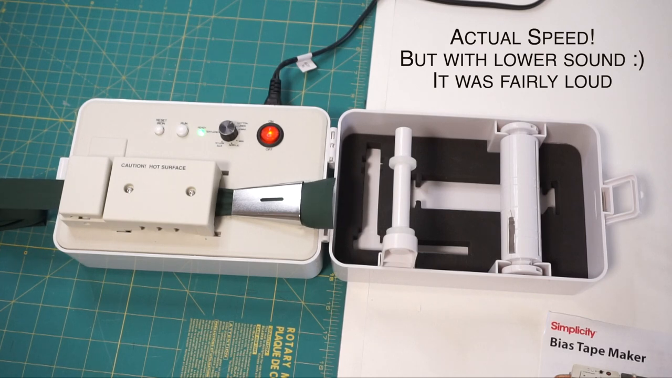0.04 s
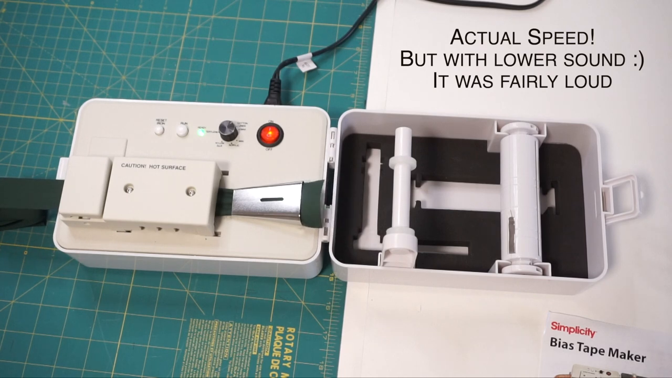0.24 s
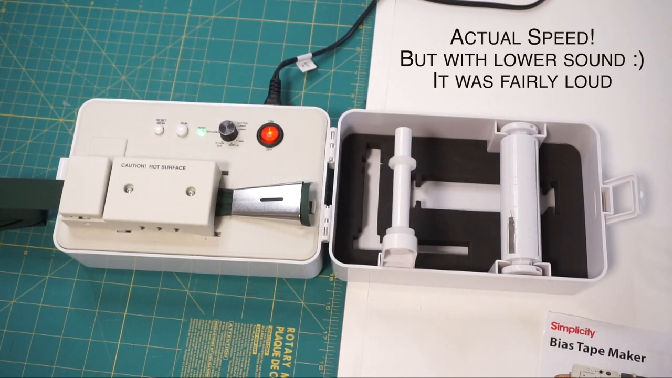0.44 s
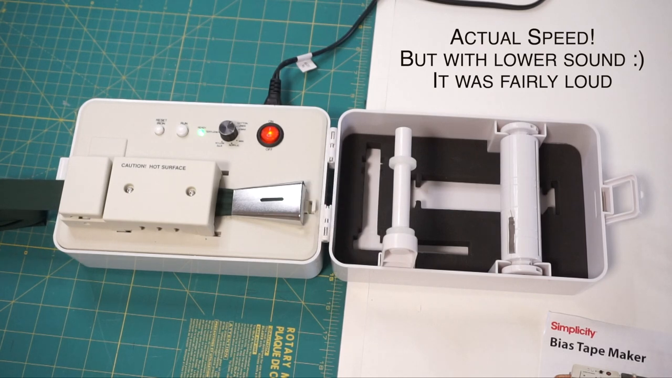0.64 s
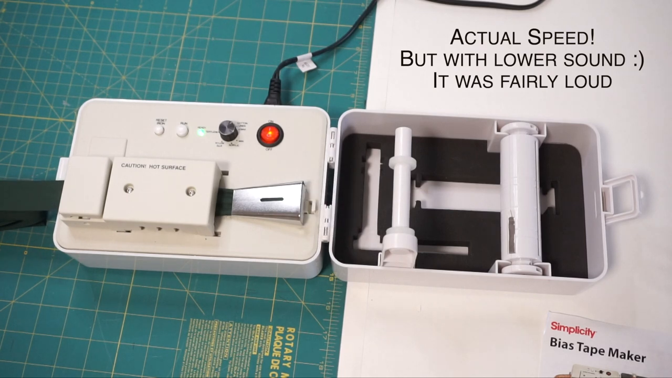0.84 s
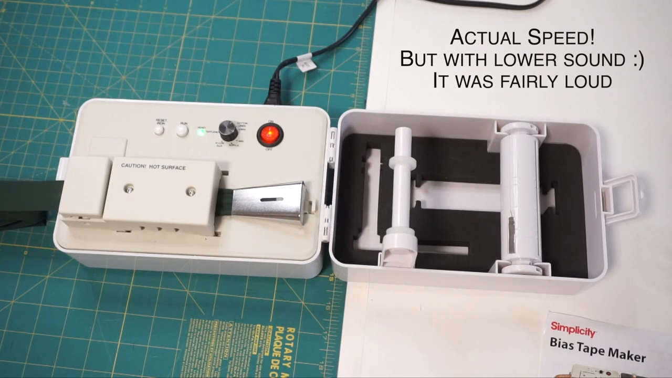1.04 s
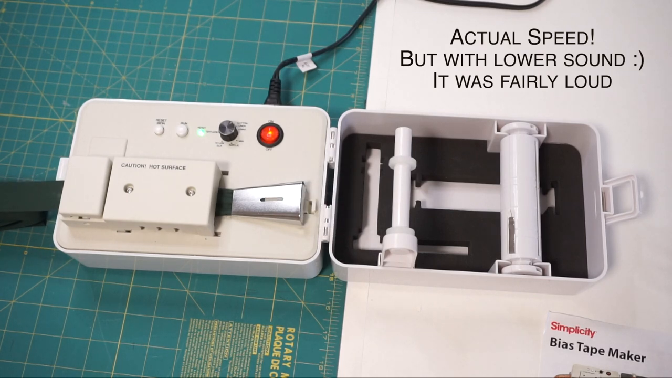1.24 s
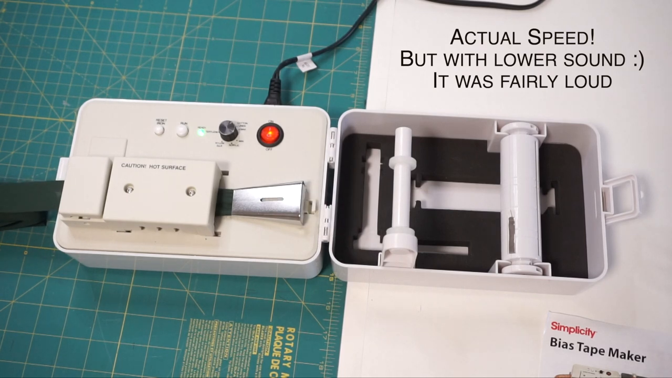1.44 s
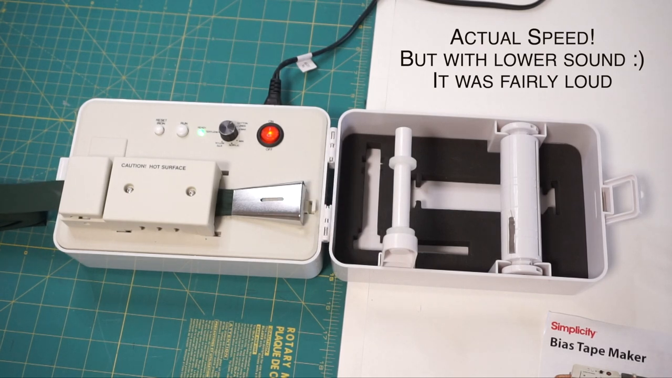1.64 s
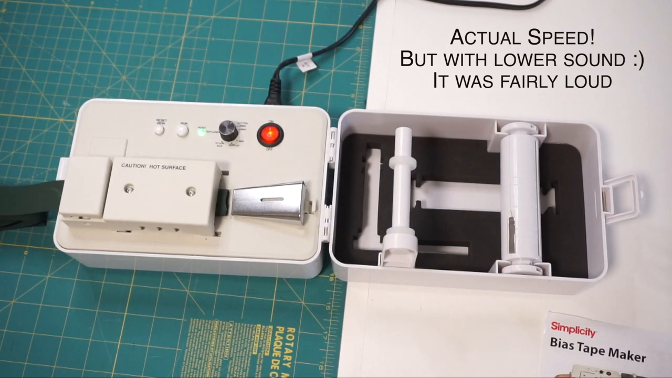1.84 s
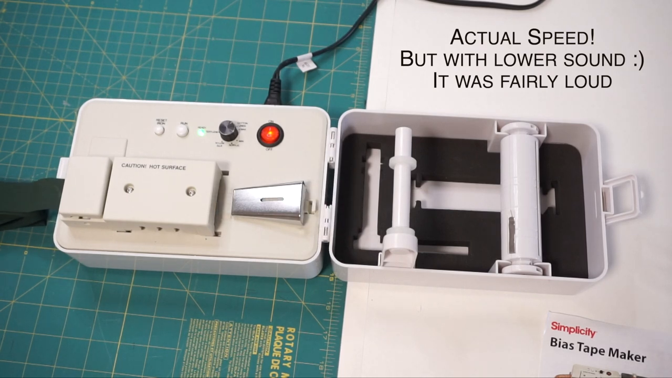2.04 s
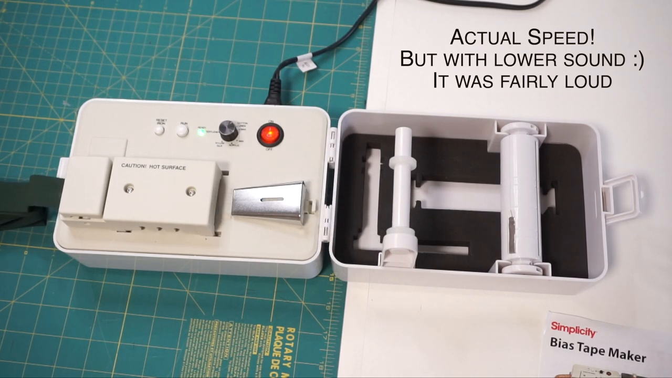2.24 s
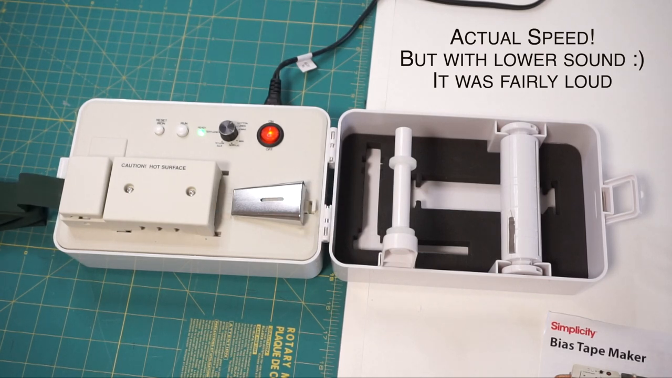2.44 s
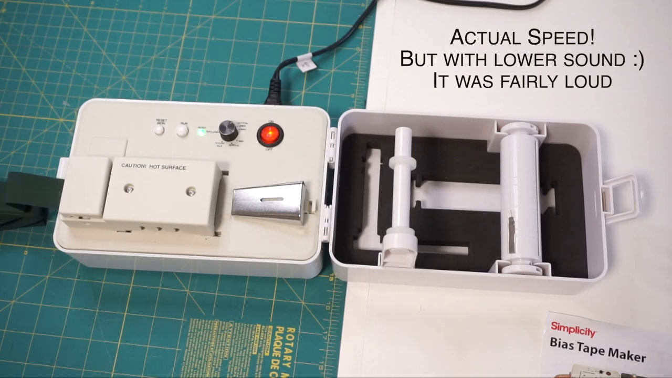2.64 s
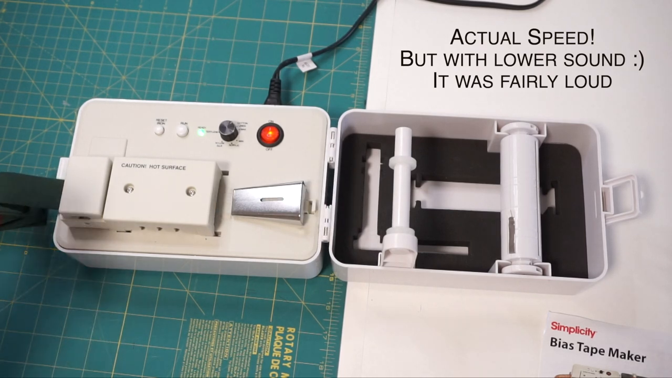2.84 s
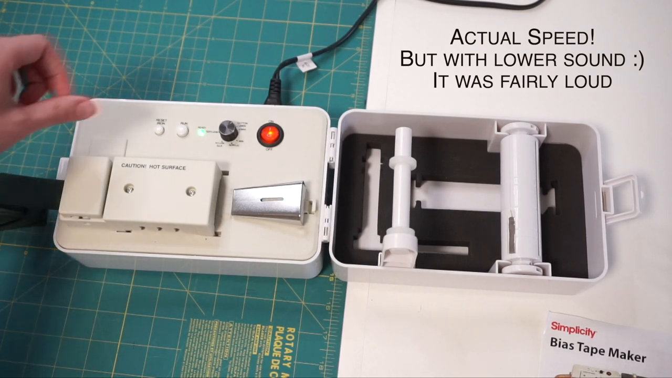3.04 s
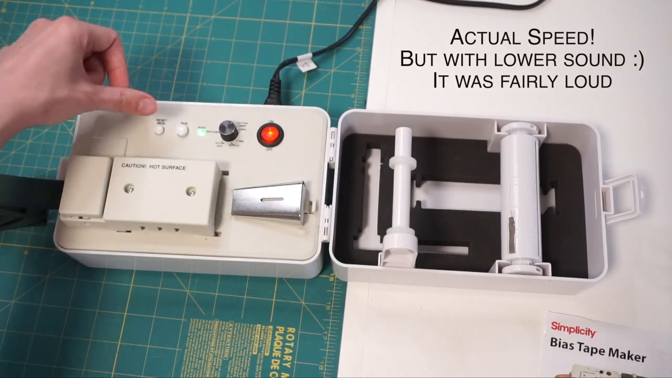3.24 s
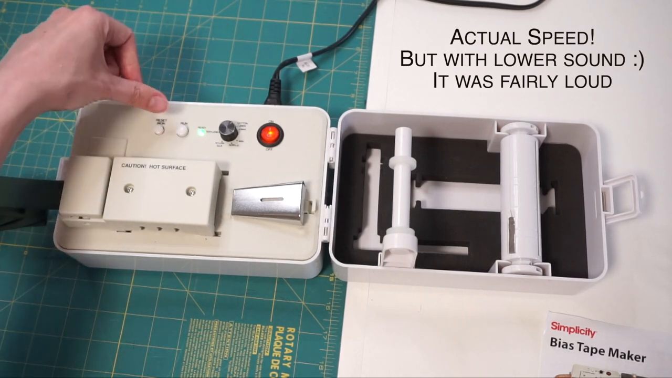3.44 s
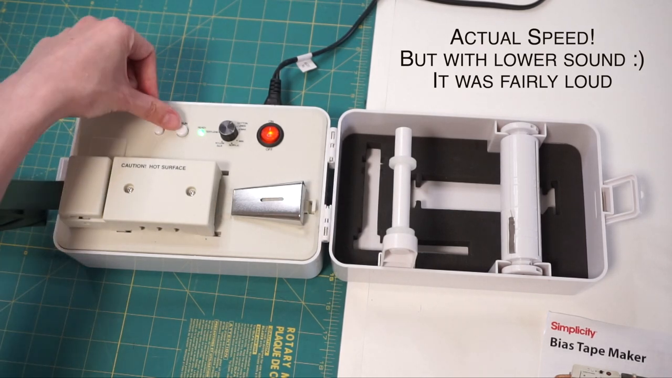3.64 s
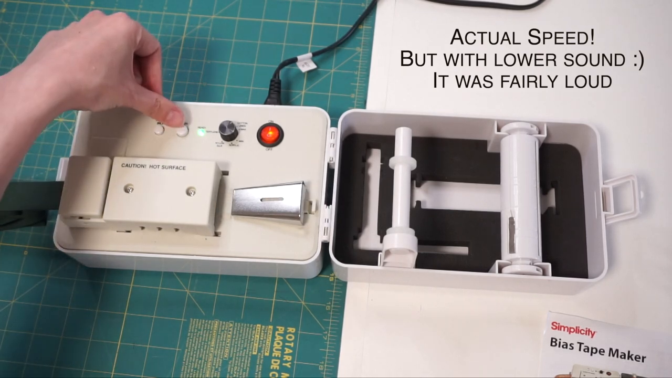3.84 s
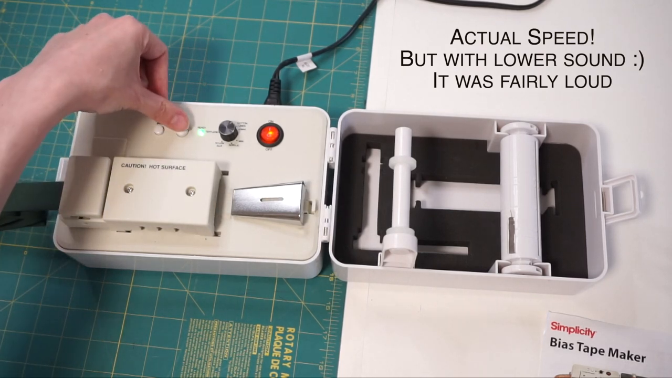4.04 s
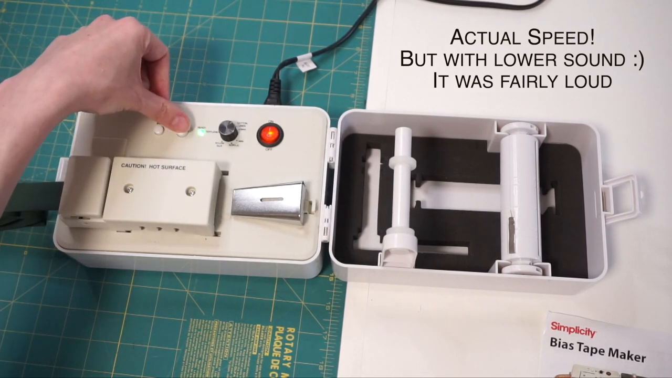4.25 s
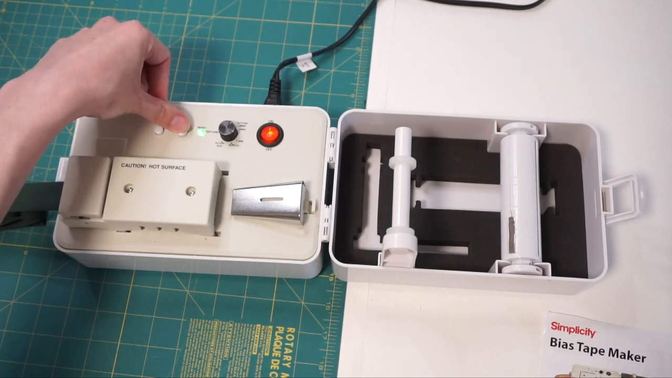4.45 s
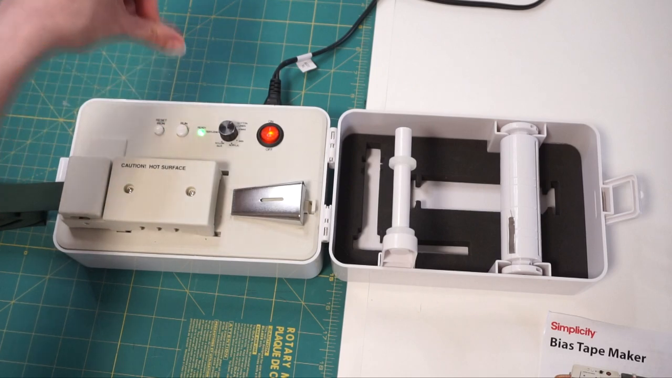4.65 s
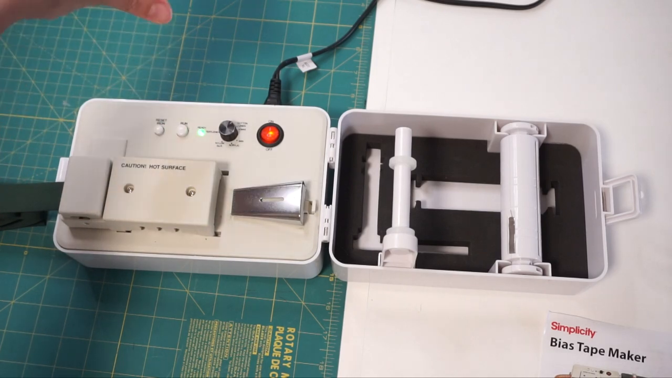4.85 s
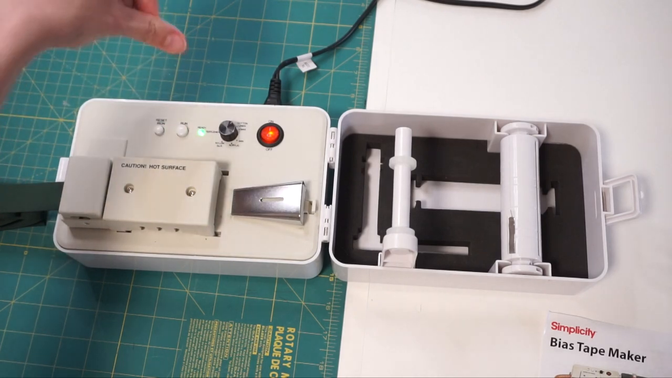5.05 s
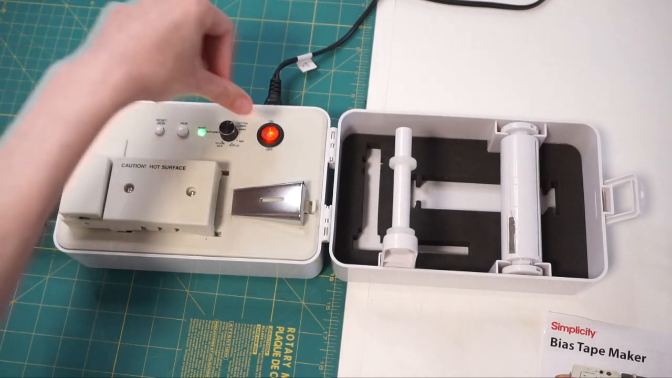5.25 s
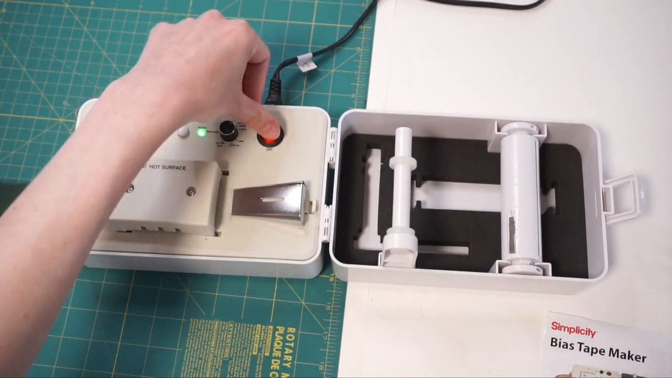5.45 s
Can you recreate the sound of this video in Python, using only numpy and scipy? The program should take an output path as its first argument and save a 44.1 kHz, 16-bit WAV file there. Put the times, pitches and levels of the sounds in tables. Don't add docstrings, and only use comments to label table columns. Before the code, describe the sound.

Close to the microphone, a small geared motor in a plastic case runs on a table with a buzzing whine, gear rattle and bright brush hiss. Its pitch sags and recovers under load, with occasional dull knocks. At about 4.4 seconds a button clicks, the motor quickly dies with a softer release click, and faint room noise remains, rising abruptly near 5 seconds.

```python
import sys
import numpy as np
from scipy import signal
from scipy.fft import rfft, irfft, next_fast_len
from scipy.io import wavfile
from scipy.ndimage import uniform_filter1d, map_coordinates

SR = 44100
rng = np.random.default_rng(int(sys.argv[2]) if len(sys.argv) > 2 else 0)


def decibels_to_gain(level_db):
    exponent = np.asarray(level_db, float) / 20
    return 10 ** exponent


def int16_out(signal):
    q = np.round(np.clip(np.atleast_2d(signal).T, -1, 1) * 32767)
    wavfile.write(sys.argv[1], SR, q.astype(np.int16))


N = 242991
RUN_DB = -46


def unit(x):
    return x / np.sqrt(np.mean(x ** 2) + 1e-20)


def along(points, hz):
    f, v = np.transpose(points)
    return np.interp(np.log(hz + 1), np.log(f + 1), v)


def wobble(rate):
    knots = rng.standard_normal(int(N * rate / SR) + 4)
    return map_coordinates(knots, [np.arange(N) * rate / SR])


def filtered(x, response):
    m = next_fast_len(N + SR // 2)
    return irfft(rfft(x, m) * response(np.fft.rfftfreq(m, 1 / SR)), m)[..., :N]


def coloured(points):
    return lambda f: decibels_to_gain(along(points, f))


def ports(pair):
    # hz, likeness (0 to 1)
    alike = [(60, 0.88), (130, 1), (270, 0.44), (570, 0.28), (1200, 0.5), (2540, 0.75), (5370, 0.34),
             (9000, 0.42), (11400, 0.27)]
    # hz, left_over_right_db
    lean = [(60, 3.5), (250, -2.5), (400, 1), (1200, 1.5), (2540, -0.1), (5370, 2.4), (9000, 2),
            (11400, 1.5)]
    # hz, left_leads_rad
    lead = [(150, 0.01), (400, 0.21), (900, -0.19), (4390, -0.032), (5000, 0.92), (6290, 0.7),
            (8180, -0.073), (8610, -1), (9820, 0.061), (11500, 0.79)]

    def mid_side(f):
        turn = np.arccos(np.clip(along(alike, f), -1, 1)) / 2
        return np.array([np.cos(turn), np.sin(turn)])

    def left_right(f):
        tilt = decibels_to_gain(along(lean, f) / 2) * np.exp(0.5j * along(lead, f))
        return np.array([tilt, 1 / tilt])

    mid, side = filtered(pair, mid_side)
    return filtered(np.array([mid + side, mid - side]), left_right)


def rush(colour, patchy_db):
    z = signal.stft(rng.standard_normal((2, N)), nperseg=512)[2]
    patches = uniform_filter1d(rng.standard_normal(z.shape[1:]), size=3, axis=0)
    patches = uniform_filter1d(patches, size=12, axis=1)
    pair = signal.istft(z * decibels_to_gain(patchy_db * unit(patches)), nperseg=512)[1][:, :N]
    return unit(ports(filtered(pair, colour)))


def burst(t, t60, lo_hz, hi_hz):
    band = signal.butter(2, [lo_hz, hi_hz], "bandpass", fs=SR, output="sos")
    return unit(signal.sosfilt(band, rng.standard_normal(len(t)))) * decibels_to_gain(-60 * t / t60)


def quiet_room():
    # hz, density_db (per Hz)
    still_air = [(12, -43), (20, -5), (156, -4), (193, -5), (679, -11), (910, -10), (1010, -13.5),
                 (1360, -16.5), (1920, -16.5), (2650, -20), (3370, -19.5), (6560, -20.5), (11800, -21),
                 (15400, -60), (22000, -120)]
    # hz, density_db (per Hz)
    house = [(20, -36), (45, -21), (80, -1), (130, -4), (400, -120)]
    # start_s, peak_db
    hollow = [
        (4.96, -64),
        (5.112, -55.5),
        (5.359, -59.5),
        (5.427, -66),
    ]
    t = np.arange(N) / SR
    lift_s, half_rise_s = 4.953, 0.0014
    gain_db = np.interp(t, [lift_s - half_rise_s, lift_s + half_rise_s], [-14.5, 2.5])
    air = decibels_to_gain(-63 + gain_db) * rush(coloured(still_air), patchy_db=1.5)
    drone = decibels_to_gain(-84.5) * rush(coloured(house), patchy_db=6.5)
    swell = sum(decibels_to_gain(db) * np.exp(-((t - s - 0.012) / 0.011) ** 2) for s, db in hollow)
    return air + drone + swell * np.sin(2 * np.pi * 905 * t)


def echo(x):
    # hz, t60_s
    room = [(200, 1), (2000, 0.49), (10000, 0.63)]
    hz, t, z = signal.stft(rng.standard_normal((2, SR // 2)), SR, nperseg=256)
    tail = signal.istft(z * decibels_to_gain(-60 * t / along(room, hz)[:, None]), SR, nperseg=256)[1]
    late = np.pad(x, (300, 0))[None]
    return signal.fftconvolve(late, tail / np.linalg.norm(tail[0]), axes=1)[:, :N]


def button():
    # start_s, peak_db, bright_db, dull_db
    clicks = [
        (4.3598, -28, -25, -22.5),
        (4.55, -35, -3, -16),
    ]
    # pitch_hz, level_db, t60_s
    panel = [(952, -16, 0.18), (1484, -7.5, 0.086), (1920, -33, 0.13), (2484, -15, 0.049), (2860, -19, 2.0),
             (3080, -31, 0.13), (3830, -20, 0.92), (4670, -14, 0.14)]
    out, t = np.zeros(N + SR), np.arange(SR // 4) / SR
    for s, db, bright_db, dull_db in clicks:
        ring = np.zeros(len(t))
        for hz, level_db, t60 in panel:
            decay = decibels_to_gain(level_db + rng.normal(0, 1.5) - 60 * t / min(t60, 0.07))
            ring += decay * np.sin(2 * np.pi * hz * t)
        snap = 0.83 * burst(t, 0.085, 1300, 3000)
        snap += decibels_to_gain(bright_db) * burst(t, 0.052, 3600, 8600)
        snap += decibels_to_gain(dull_db) * burst(t, 0.18, 420, 1200)
        out[round(s * SR):][:len(t)] += decibels_to_gain(db - 6.5) * (ring + snap)
    return out[:N]


def knocks():
    # start_s, peak_db, ring_hz, crack_db, thud_db
    seams = [
        (0.382, -54, 437, 17, -14),
        (1.305, -58, 430, -1, -9),
        (2.128, -51, 428.4, 9, -16),
        (3.022, -51, 439, 0, -11),
        (3.838, -44, 441.3, 7, -23),
        (3.977, -46, 512.7, 7.5, -25),
        (4.03, -52, 570, -4, -22),
    ]
    out, t = np.zeros(N + SR), np.arange(SR // 4) / SR
    onset = 1 - np.exp(-t / 0.0067)
    for s, db, hz, crack_db, thud_db in seams:
        ring = 1.1 * np.sin(2 * np.pi * hz * t) * decibels_to_gain(-60 * t / 0.088)
        ring += 0.46 * burst(t, 0.17, 327, 830)
        crack = decibels_to_gain(crack_db - 8) * burst(t, 0.12, 640, 3600)
        thud = decibels_to_gain(thud_db - 6) * burst(t, 0.28, 50, 410)
        out[round(s * SR):][:len(t)] += decibels_to_gain(db + 0.5) * (ring + crack + thud) * onset
    return out[:N]


def controls():
    # time_s, turns_hz
    shaft = [(0.0, 133.7), (0.31, 127.5), (0.58, 129.6), (1.04, 119.2), (1.24, 127.9), (1.39, 131.7),
             (1.73, 135.9), (1.97, 130.9), (2.37, 136), (2.68, 124.9), (2.76, 124.2), (3.21, 136.3),
             (3.85, 137.7), (3.88, 139.6), (4.04, 136), (4.12, 141.3), (4.35, 136.6), (4.5, 140.1)]
    t = np.arange(N) / SR
    time_s, turns_hz = np.transpose(shaft)
    hz = uniform_filter1d(np.interp(t, time_s, turns_hz, right=139), size=2000)
    free_hz, sag_hz = 133.2, 8.4
    load = np.clip((free_hz - hz) / sag_hz, 0, 2)
    lean_s, in_s, out_s = 4.0, 0.07, 0.16
    lean = np.exp(np.where(t < lean_s, (t - lean_s) / in_s, (lean_s - t) / out_s))
    run_db = RUN_DB + 0.43 * load - 6.5 * lean
    off_s, knee_s, db_per_s = 4.504, 0.04, 197
    fall_db = -db_per_s * knee_s * np.logaddexp(0, (t - off_s) / knee_s)
    return hz, load, run_db, fall_db


def modes(f, peaks):
    return sum(decibels_to_gain(db) ** 2 / (1 + (2 * (f - c) / w) ** 4) for c, w, db in peaks)


def body(spectrum, peaks):
    # pitch_hz, width_hz
    nulls = [(3500, 90), (4350, 80), (5250, 140), (7850, 200), (9170, 110), (9600, 67), (10680, 93),
             (11080, 80)]

    def gain(f):
        dips = np.prod([1 - 0.25 / (1 + (2 * (f - c) / w) ** 2) for c, w in nulls], axis=0)
        between = decibels_to_gain(along(spectrum, f) - 5.5)
        return dips * np.sqrt(modes(f, peaks) + between ** 2)

    return gain


def whine():
    # shaft_order, level_db
    free_orders = [(1, 0), (2, -24), (3, -11), (4, -23.5), (5, -29.5), (6, -24), (7, -1.5), (8, -1),
                   (9, -5), (10, -6.5), (11, -9.5), (12, -6.5), (13, -11.5), (14, -7.5), (15, -1), (16, -7),
                   (17, -7), (18, -10), (19, -2), (20, -11), (21, -4), (22, -13.5), (23, -17), (24, -7.5)]
    # shaft_order, level_db
    loaded_orders = [(1, -19), (2, -30), (3, -27), (4, -31), (5, -32), (6, -24), (7, -16), (8, -3),
                     (9, -16.5), (10, -15.5), (11, -25), (12, -13), (13, -13), (14, -3), (15, -4),
                     (16, 2.5), (17, -7.5), (18, -22), (19, -18), (20, -18), (21, -8.5), (22, -16),
                     (23, -13), (24, -4)]
    # shaft_order, pitch_hz, width_hz, level_db
    sympathy = [(1, 136.7, 7.8, -60), (1, 100, 30, -68), (3, 404, 13.7, -65), (3, 422, 7.3, -66),
                (7, 934, 64, -64.5), (8, 984, 62, -58), (8, 1085, 46, -61), (22, 2800, 28, -53.5),
                (15, 1972, 29, -54.5), (15, 1865, 26, -54.5)]
    hz, load, run_db, fall_db = controls()
    angle = 2 * np.pi * np.cumsum(hz * (1 + 0.001534 * wobble(25.14))) / SR
    kick_db = 6.5 * np.exp(-((np.arange(N) / SR - 4.46) / 0.042) ** 2)
    share = np.minimum(load, 1)
    out = np.zeros(N)
    for (order, free_db), (_, loaded_db) in zip(free_orders, loaded_orders):
        k = round(order)
        balance_db = (1 - share) * (free_db - 15.5) + share * (loaded_db - 14.0)
        drift = decibels_to_gain(run_db + balance_db + 3.5 * wobble(9))
        crossed = [mode for o, *mode in sympathy if round(o) == k]
        swell_db = run_db - RUN_DB + 1.27 * np.sqrt(min(k, 8)) * wobble(8) + (k == 1) * kick_db
        swell = np.sqrt(modes(k * hz, crossed)) * decibels_to_gain(swell_db)
        level = swell if k in (1, 3, 7, 8) else np.hypot(swell, drift)
        out += np.sqrt(2) * level * np.sin(k * angle + rng.uniform(0, 2 * np.pi))
    return out * decibels_to_gain(fall_db), angle


def motor():
    # hz, density_db (per Hz)
    gear_colour = [(780, -59), (880, -32.5), (1100, -21), (1250, -6.5), (1600, -8), (1750, -14.5),
                   (2260, 0.5), (3100, -0.5), (3480, -1.5), (4600, -9), (6000, -34), (10000, -120)]
    # pitch_hz, width_hz, level_db
    case_modes = [(917, 34, -5), (1020, 17, -15.5), (1766, 41, -1), (1855, 61, 4), (1964, 78, 0),
                  (2130, 120, -4), (2544, 48, -0.5), (2809, 27, 1), (3160, 79, -4.5), (3692, 25, 2),
                  (4027, 127, -2)]
    # hz, density_db (per Hz)
    idler_colour = [(650, -33), (1100, 1.5), (1150, -21), (1240, -1.5), (1660, -10.5), (1750, 0),
                    (2280, -42), (3850, -120)]
    # hz, density_db (per Hz)
    brush_colour = [(2530, -32), (4300, -7.5), (5360, -2.5), (5830, -2.5), (7800, -1.5), (8420, -4.5),
                    (9440, -4.5), (10600, -7), (11300, -19), (11800, -40), (15400, -52), (22000, -120)]
    # pitch_hz, width_hz, level_db
    cover_modes = [(4710, 28, -7.5), (4880, 84, -7.5), (5820, 91, -1.5), (5930, 29, -0.5), (6210, 42, 0.5),
                   (6570, 57, -1.5), (6676, 48, -4), (7380, 76, -6.5), (8400, 38, -4), (8160, 83, -5.5),
                   (8400, 68, -13.5), (8530, 90, -2.5), (8880, 82, -3.5), (9910, 190, -9.5),
                   (10240, 99, -8.5), (10450, 100, -8), (10860, 46, -4.5), (11150, 72, -7),
                   (11436, 264, -13.5)]
    # hz, density_db (per Hz)
    table_colour = [(12, -40), (25, -28), (70, -23.5), (123, 4), (177, -4), (300, -8), (450, 2.5),
                    (574, -1.5), (700, -17), (850, -18), (1100, -40), (1870, -120)]
    tones, angle = whine()
    _, load, run_db, fall_db = controls()
    hiss_db = run_db + fall_db + 0.41 * wobble(3.52)
    shake_db = run_db + 0.69 * fall_db

    beat = 1 + 0.2 * np.cos(angle)
    rattle = unit(beat * rush(body(gear_colour, case_modes), patchy_db=1.5))
    rattle *= decibels_to_gain(shake_db - 4.5 + 0.52 * wobble(7.63))

    idler_db = shake_db - 13.5 - 13 * load ** 1.3 + 1.3 * wobble(8)
    idler = decibels_to_gain(idler_db) * rush(coloured(idler_colour), patchy_db=0.5)

    sparks = decibels_to_gain(0.44 * wobble(900)) * (1 + 0.081 * np.cos(angle + 1.47))
    hiss = decibels_to_gain(hiss_db + 2.05) * unit(sparks * rush(body(brush_colour, cover_modes), patchy_db=1.0))

    rumble_db = hiss_db - 26.5 - 4.6 * np.minimum(load, 1)
    rumble = decibels_to_gain(rumble_db) * rush(coloured(table_colour), patchy_db=7.5)
    spread = ports(np.array([tones, 0.19 * np.roll(tones, 157)]))
    return spread + rattle + idler + hiss + rumble


def scene():
    hits = knocks() + button()
    direct = hits * decibels_to_gain([[0.7], [-0.7]])
    return motor() + direct + decibels_to_gain(-4.5) * echo(hits) + quiet_room()


def drop_faint_bands(x):
    hz, t, z = signal.stft(x, SR, nperseg=1024)
    pitch = hz[:, None]
    power = np.mean(np.abs(z) ** 2, axis=0) + 1e-20

    def blocks(v):
        return v[np.arange(len(hz)) // 5 * 5][:, np.arange(len(t)) // 2 * 2]

    band = uniform_filter1d(power, size=5, axis=0, origin=-2)
    band_db = 10 * np.log10(uniform_filter1d(band, size=3, axis=1))
    around_db = 10 * np.log10(np.abs(uniform_filter1d(power, size=48, axis=0)))
    mask_db = np.maximum(around_db - 6, -109)
    mask_db = np.maximum(mask_db, np.roll(mask_db, 4, axis=1) - 3.5)
    mask_db += 2.3 * (power.sum(axis=0) < decibels_to_gain(-58) ** 2)
    mask_db = uniform_filter1d(mask_db, size=3, axis=1)
    luck = unit(uniform_filter1d(rng.standard_normal(power.shape), size=5, axis=1))
    keep = blocks(band_db - mask_db + 2.7 * luck > 0) | (pitch < 1900)
    keep &= blocks(pitch < 11560 + 330 * luck[0])
    joined = np.where(pitch > 11250, z.mean(axis=0), z)
    return signal.istft(keep * joined, nperseg=1024)[1][:, :N]


def top_cut(x):
    return signal.sosfilt(signal.butter(12, 11960, fs=SR, output="sos"), x)


def record(dry):
    mix = drop_faint_bands(dry)
    return top_cut(mix)


dry = scene()
out = record(dry)
int16_out(out)
```